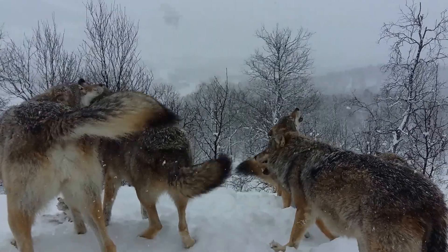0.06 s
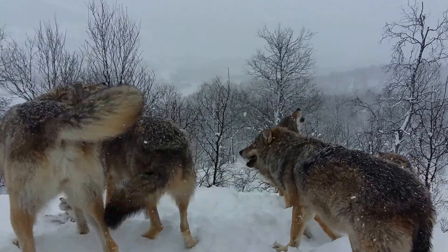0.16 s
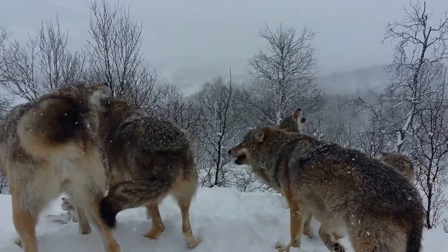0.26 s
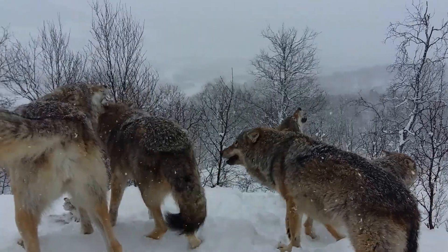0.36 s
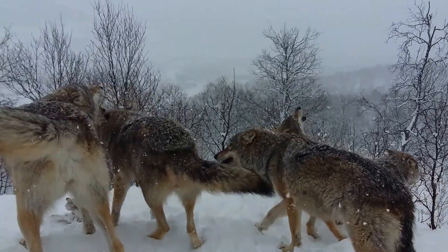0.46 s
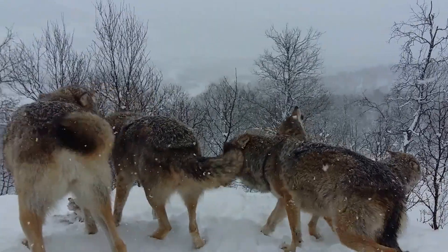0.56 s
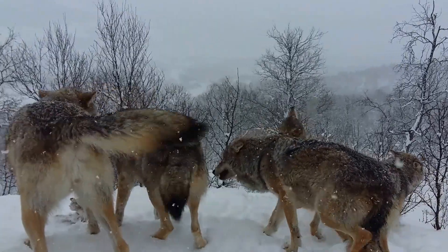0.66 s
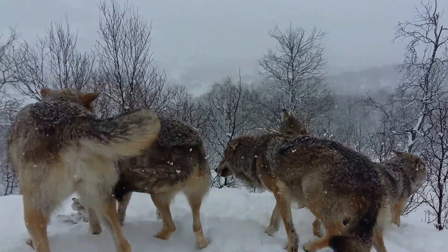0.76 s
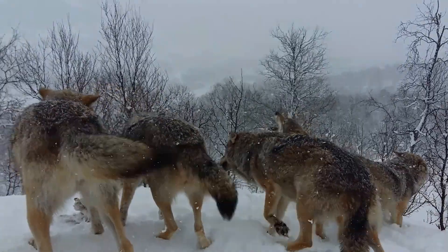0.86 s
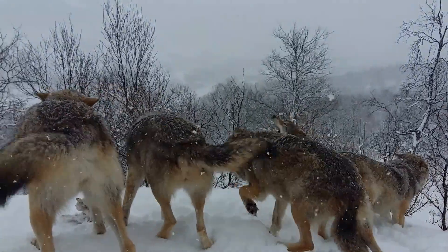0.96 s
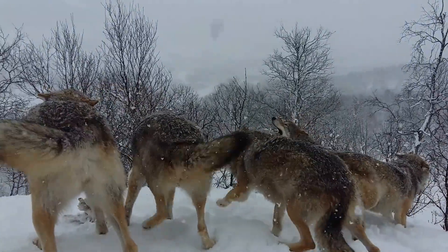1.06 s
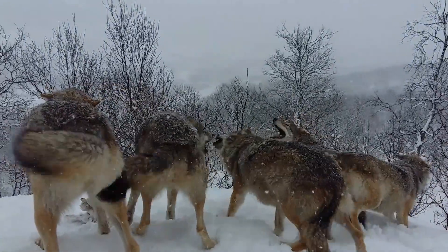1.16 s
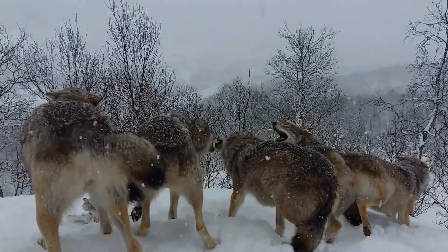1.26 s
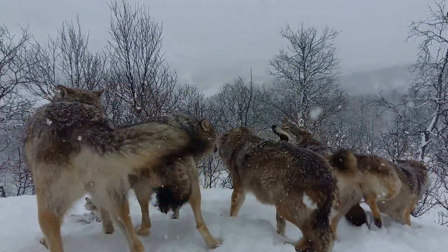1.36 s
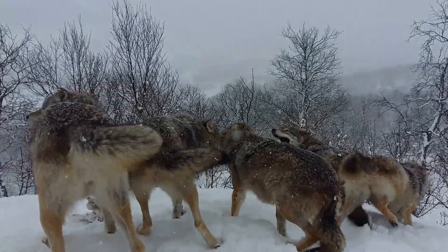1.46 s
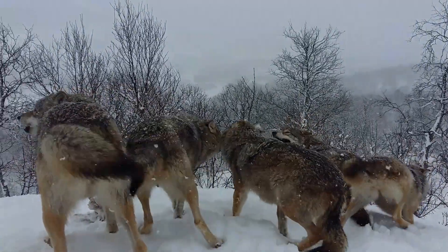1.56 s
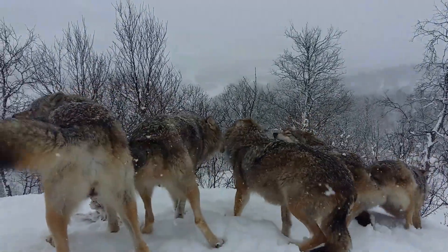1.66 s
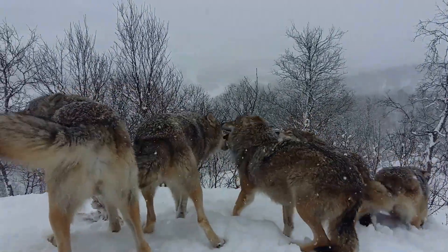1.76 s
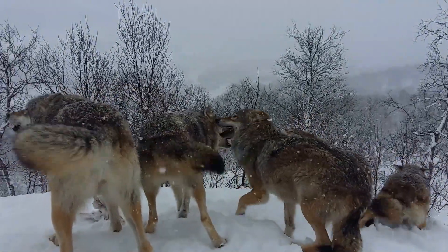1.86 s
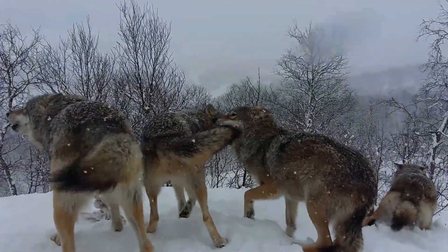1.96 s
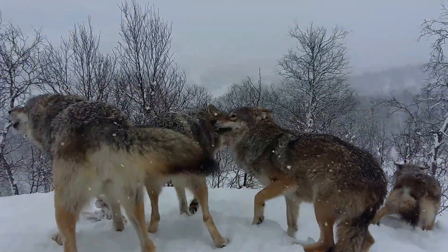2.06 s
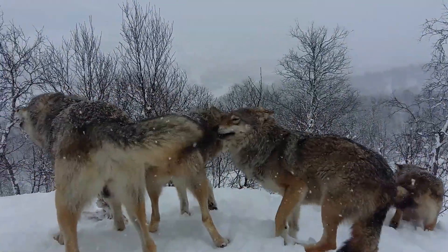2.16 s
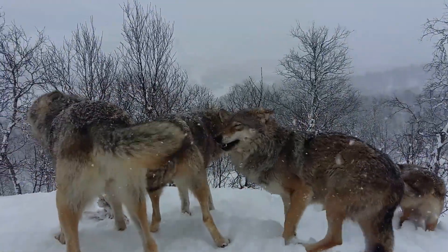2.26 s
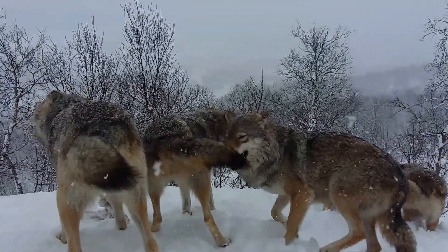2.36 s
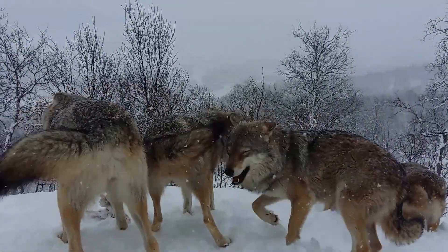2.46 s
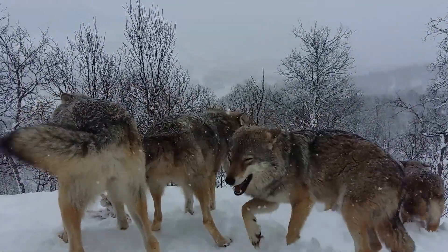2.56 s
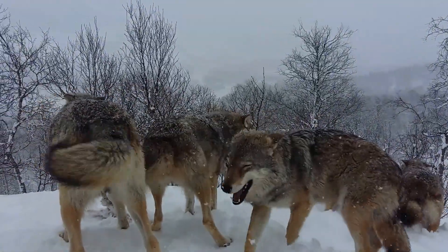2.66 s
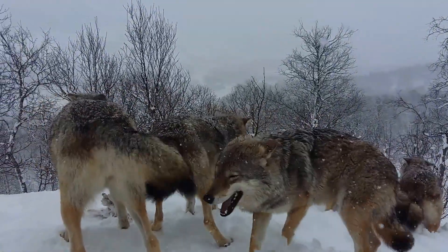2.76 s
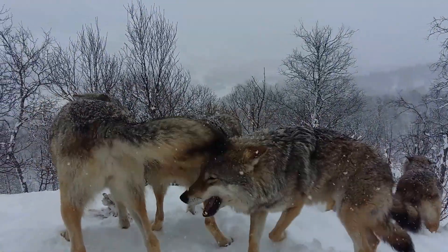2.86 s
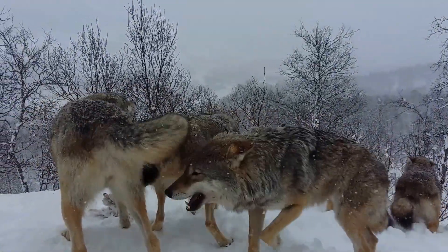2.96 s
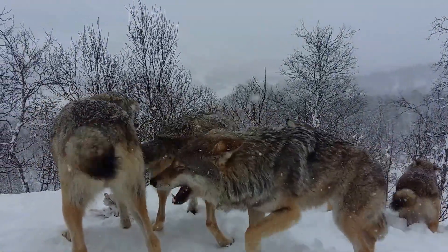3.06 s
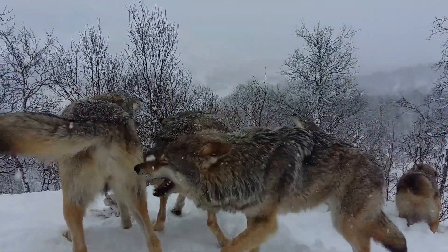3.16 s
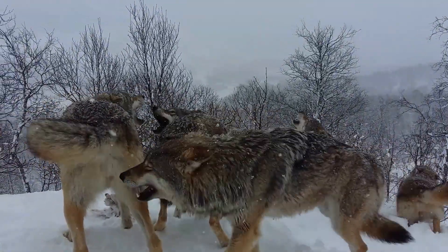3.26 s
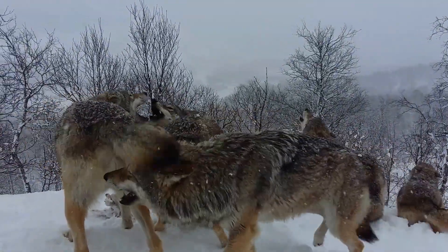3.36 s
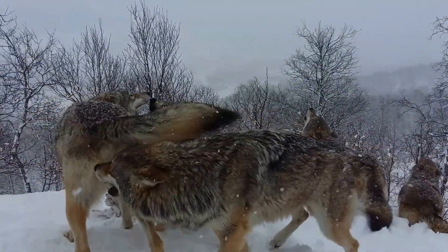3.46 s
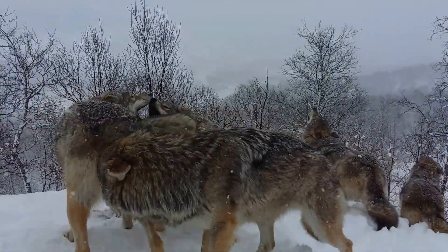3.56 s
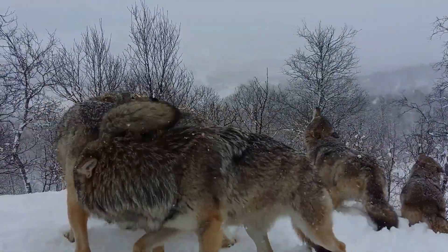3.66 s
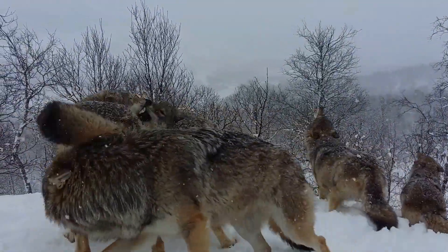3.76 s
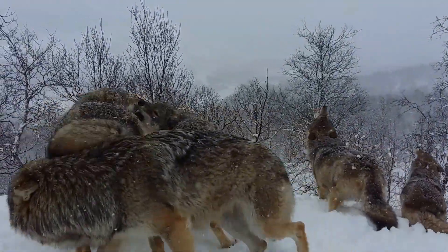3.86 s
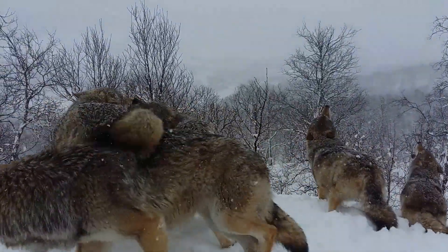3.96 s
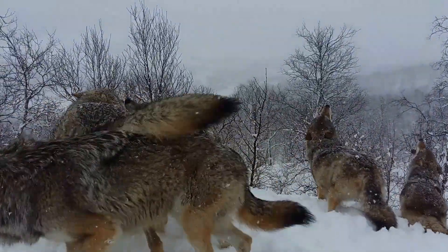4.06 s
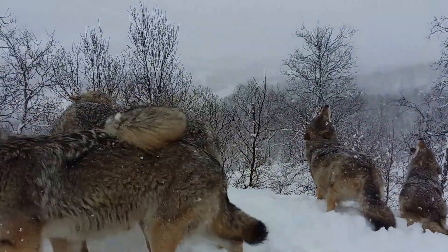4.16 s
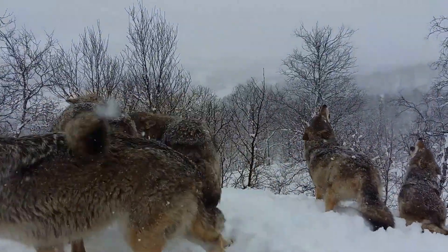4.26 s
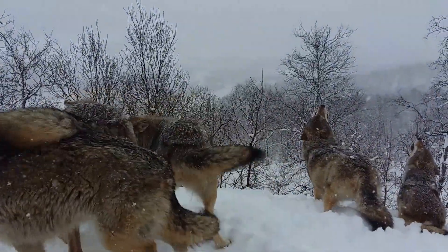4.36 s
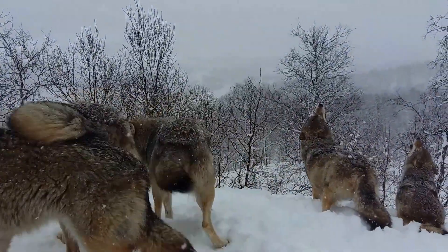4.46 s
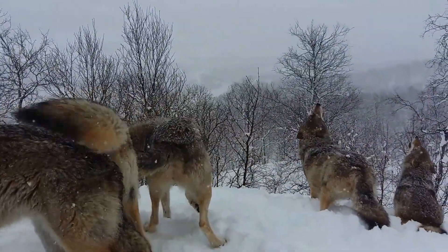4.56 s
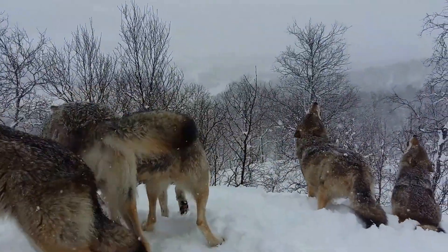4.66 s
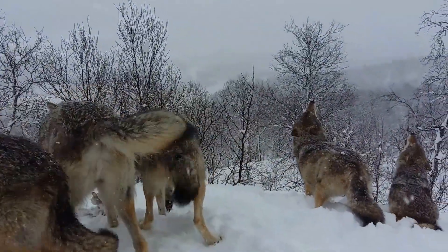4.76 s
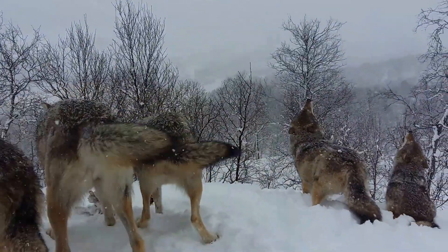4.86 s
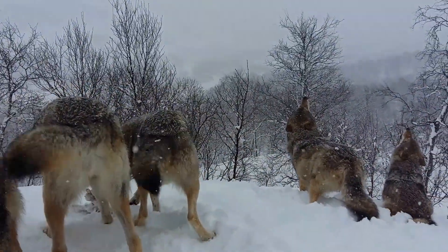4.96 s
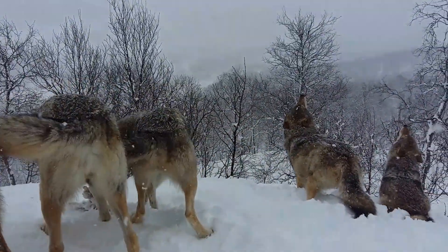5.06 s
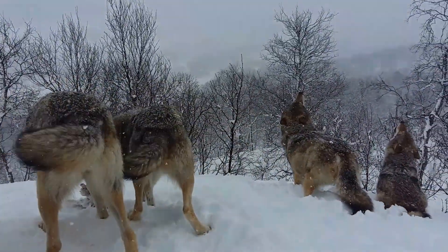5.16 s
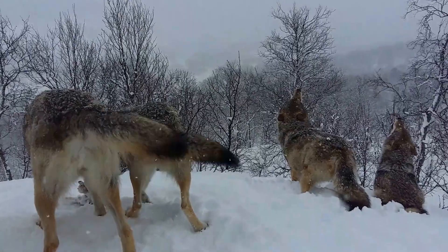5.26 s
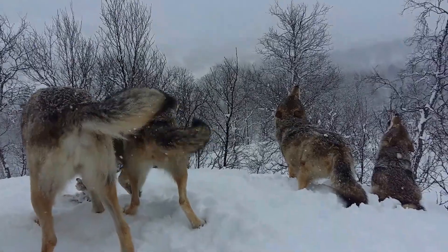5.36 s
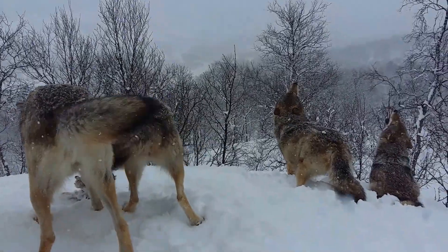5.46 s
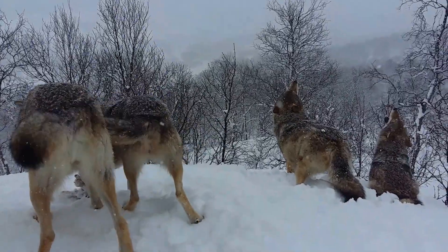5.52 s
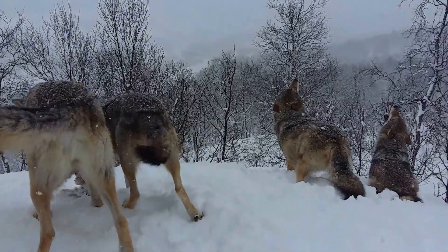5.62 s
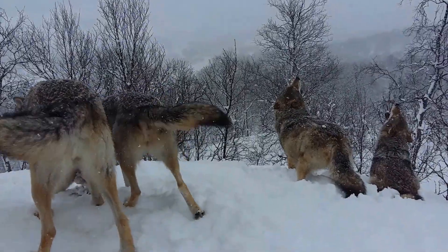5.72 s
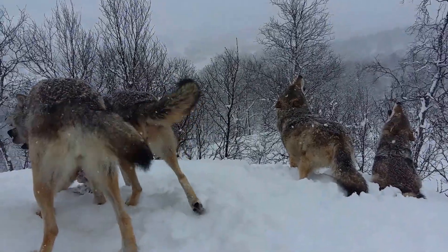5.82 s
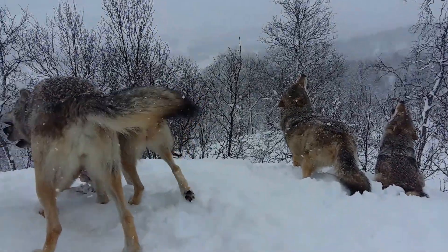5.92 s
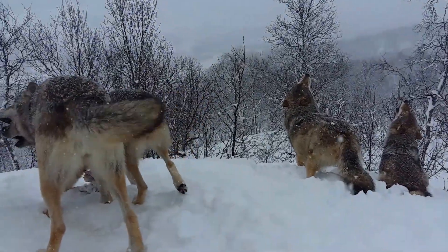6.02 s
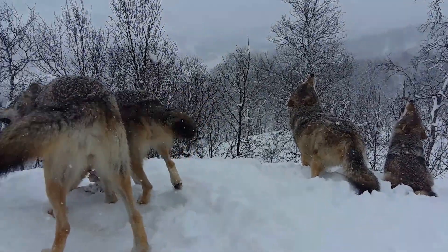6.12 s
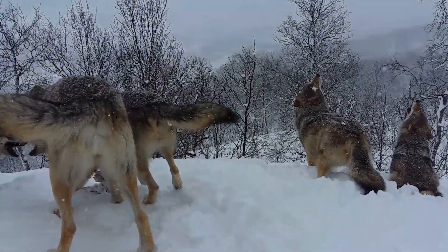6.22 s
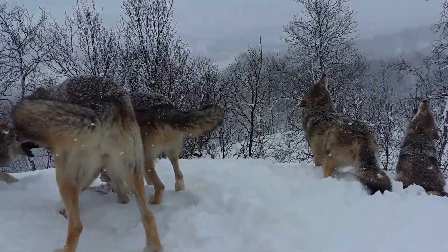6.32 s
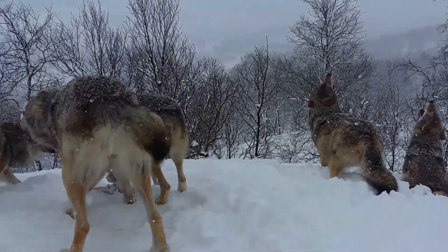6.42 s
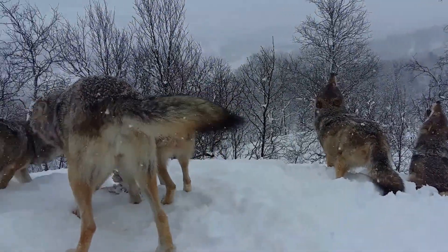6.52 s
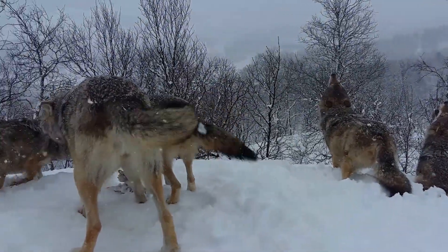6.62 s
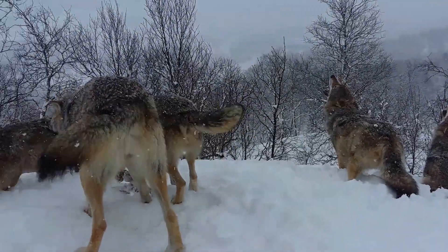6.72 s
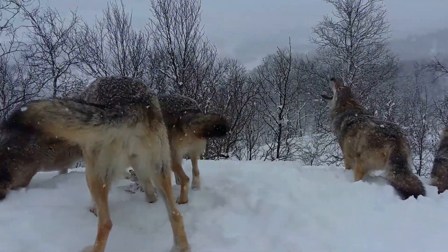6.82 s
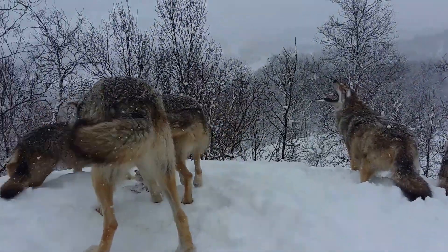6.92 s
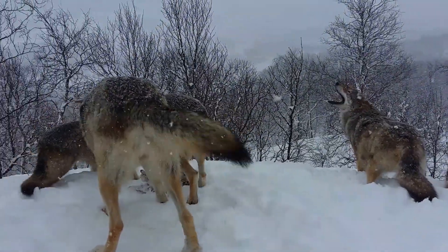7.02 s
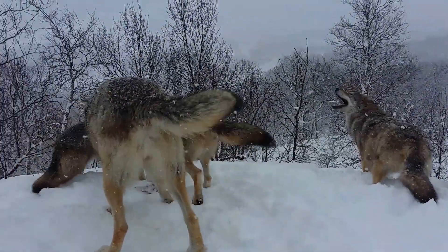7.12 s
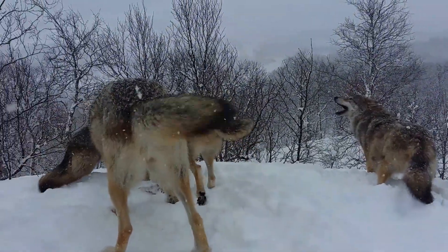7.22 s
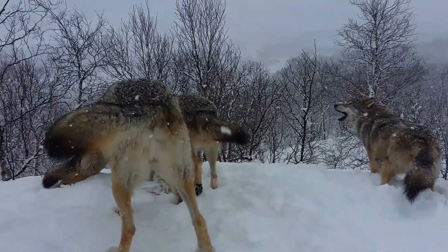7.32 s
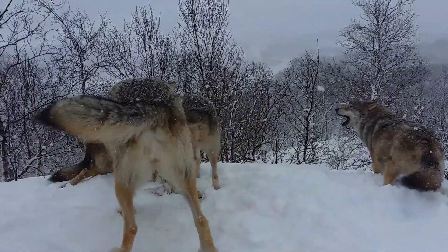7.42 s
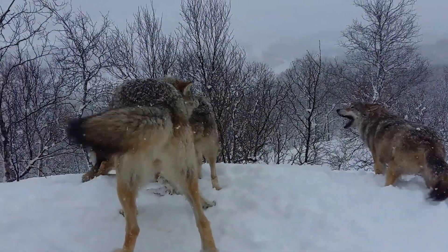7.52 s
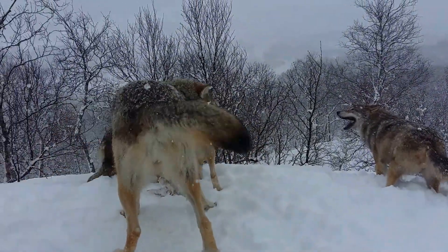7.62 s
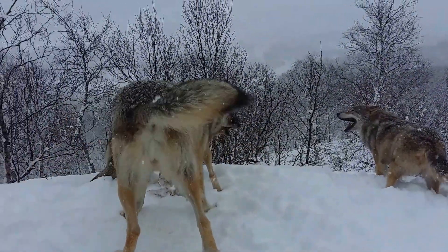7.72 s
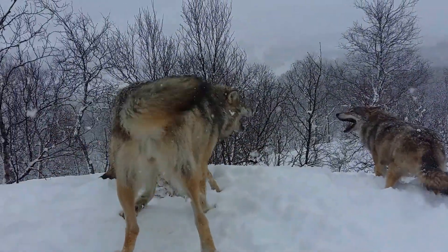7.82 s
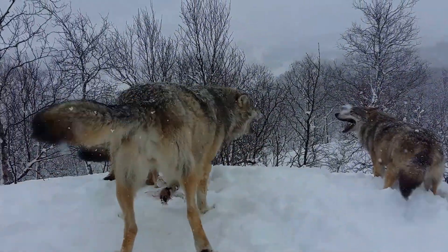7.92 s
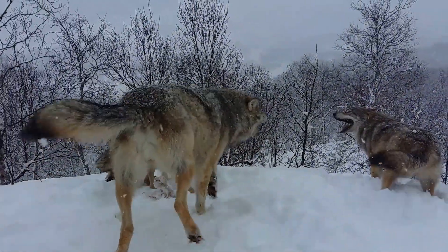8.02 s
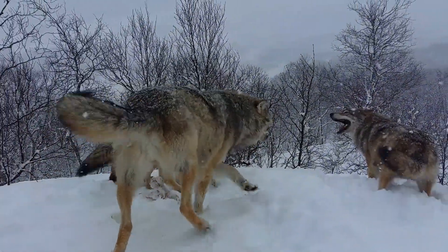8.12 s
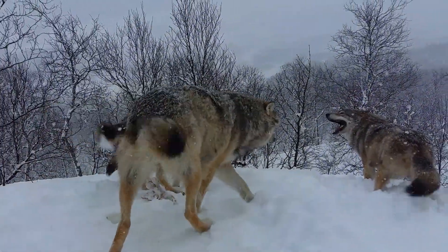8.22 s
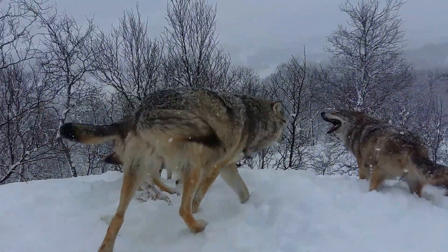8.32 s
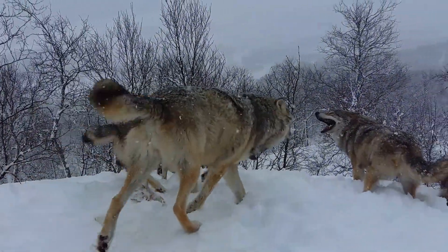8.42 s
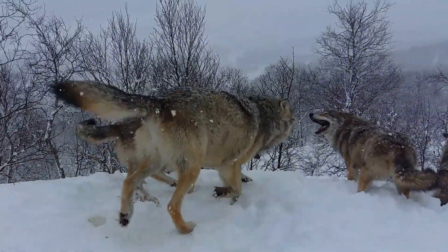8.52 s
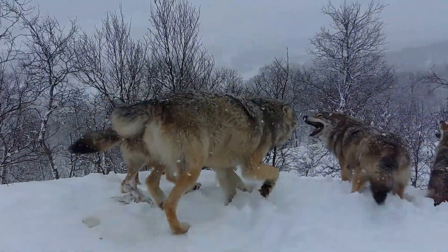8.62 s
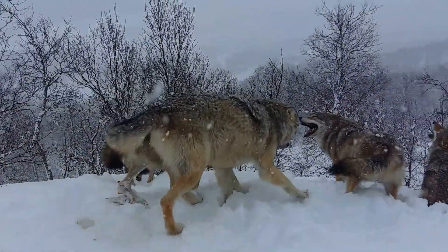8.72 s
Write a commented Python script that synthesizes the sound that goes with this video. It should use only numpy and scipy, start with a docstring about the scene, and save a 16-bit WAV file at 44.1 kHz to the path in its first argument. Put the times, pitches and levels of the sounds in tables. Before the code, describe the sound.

After a brief silence, a near wolf's long mid-low howl fades in quickly and the pack joins. Wavering yowls break into yelps, thin high squeals ride on top, and farther wolves fill the background from all sides. Soft thuds of paws in snow and a few very short snarls sit underneath. The microphone is close among the animals in an open snowy clearing, with a soft, scattered echo from bare trees.

```python
"""A wolf howls long and low over a snowy clearing, and its pack, near and far, joins in chorus.
Wavering yowls and high squeals ride over the howls; each voice is a stack of harmonics shaped by throat and mouth,
growing louder and more open as its pitch rises. Paws thud as swells of dark noise, a few snarls are chopped noise,
and the bare trees throw back a soft echo made of scattered taps."""
import sys
import numpy as np
from scipy import signal
from scipy.fft import rfft, irfft
from scipy.io import wavfile
from scipy.ndimage import uniform_filter1d, minimum_filter1d, map_coordinates

SR = 44100
rng = np.random.default_rng(int(sys.argv[2]) if len(sys.argv) > 2 else 0)


def pcm_store(signal):
    """Save signal as 16-bit PCM."""
    levels = np.round(np.clip(np.atleast_2d(signal), -1, 1) * 32767)
    wavfile.write(sys.argv[1], SR, levels.astype(np.int16).T)


N = 387330
TIME = np.arange(N) / SR

# Long, steady howls of the near wolves, one call a row. Columns: level_db [dB, before the gain of its kind],
# swell_db [dB, rise from start to end], mouth_hz [Hz, resonance at the call's average pitch],
# bright_db [dB per octave of harmonics, up to the sixth], lag_ms [ms, left ear later than right],
# pitch [list of (point_s [s], pitch_hz [Hz])]
HOWL_CALLS = [(-18.5, -2, 753, 6.5, -0.039, [(0.252, 510), (0.332, 486.5), (0.396, 423.6), (0.436, 457.2),
              (0.592, 414.5), (0.61, 438), (0.782, 452), (0.968, 437)]),
              (-20.0, 4, 830, -10.5, -0.18, [(1.316, 499), (1.432, 362), (1.646, 340), (1.8, 351.3),
              (2.038, 350), (2.42, 425.7), (2.562, 526), (2.58, 435)]),
              (-23.5, 12.5, 590, 8.5, -0.035, [(1.834, 451.6), (2.026, 371.4)]),
              (-23, 4.5, 780, 2.0, 0.0, [(3.042, 406), (3.184, 424.4), (3.44, 349)]),
              (-20.5, 5, 620, -1.5, 0.084, [(3.446, 395), (3.884, 422), (4.042, 485.4), (4.154, 473.8),
              (4.546, 451.5), (4.894, 472), (5.096, 521)]), (-24.5, 6.5, 940, -0.5, -0.096, [(4.304, 708),
              (4.524, 582), (4.644, 638), (5.03, 645.4)]), (-21, -5, 930, 2.5, 0.094, [(5.1, 482.3),
              (5.208, 493.5), (5.306, 441.6), (5.566, 403)]),
              (-20.5, -7.5, 766, -1.5, -0.032, [(5.566, 469), (5.608, 485.4), (5.774, 512), (5.792, 461),
              (6.032, 404.4)]), (-15, 5.5, 920, 0, -0.32, [(5.854, 559.4), (5.996, 531), (6.096, 609)]),
              (-19.5, 6.5, 700, 4.5, -0.35, [(6.012, 451), (6.218, 439.7), (6.356, 496.4)]),
              (-31.5, -4.5, 1140, 1, -0.15, [(6.58, 447), (6.982, 427), (7.288, 359), (7.85, 433.6)]),
              (-21.5, -10.5, 700, -1, 0.0, [(7.176, 504.7), (7.194, 617.4), (7.32, 563), (7.528, 607),
              (7.724, 572), (7.892, 660)]), (-20.5, 14.5, 730, -2, -0.018, [(8.512, 399), (8.682, 375.3),
              (8.774, 437), (8.82, 470)])]
# Wavering yowls that break upward into yelps. Columns: level_db [dB, before the gain of its kind], swell_db [dB],
# mouth_hz [Hz], bright_db [dB per octave], lag_ms [ms], pitch [list of (point_s [s], pitch_hz [Hz])]
YOWL_CALLS = [(-16.0, 4.5, 804, 3.5, -0.1, [(0.486, 420.4), (0.52, 763), (0.692, 771), (0.716, 1036),
              (0.788, 830), (0.894, 743), (0.96, 626), (1.008, 876), (1.054, 603), (1.108, 512)]),
              (-19, 7, 1030, -2.5, -0.05, [(0.75, 1015), (0.878, 986), (0.968, 844), (1.006, 560),
              (1.132, 516)]), (-15.5, -2.5, 965, -2.5, -0.014, [(1.118, 499), (1.14, 625), (1.264, 622),
              (1.422, 573), (1.456, 903), (1.526, 521), (1.588, 591), (1.658, 516)]),
              (-16.0, -1, 930, -1.5, 0.0, [(1.132, 479), (1.194, 833), (1.212, 605), (1.25, 855),
              (1.288, 611)]), (-20, 4.5, 820, 6, -0.029, [(1.454, 472), (1.558, 516), (1.606, 435),
              (1.774, 478), (1.792, 419), (1.906, 460), (1.996, 495), (2.048, 435)]),
              (-18.0, -2, 690, 8, -0.028, [(2.058, 472), (2.118, 475), (2.152, 595), (2.206, 608),
              (2.242, 1039), (2.29, 413)]), (-15, 4.5, 1190, 6.5, -0.055, [(2.27, 928), (2.286, 877),
              (2.306, 749), (2.4, 489), (2.452, 471), (2.498, 619), (2.55, 512), (2.61, 474), (2.73, 497)]),
              (-19.5, -1, 870, 8.0, 0.0, [(2.37, 693), (2.392, 790), (2.456, 680), (2.506, 812),
              (2.58, 548), (2.666, 767), (2.716, 658)]), (-16, -5.5, 880, 5, -0.043, [(2.738, 692),
              (2.788, 984), (2.814, 840), (2.958, 852), (3.02, 770), (3.046, 902), (3.102, 852),
              (3.208, 992), (3.34, 820), (3.47, 1002), (3.514, 614)]),
              (-18.5, -5, 1130, 4.5, -0.035, [(2.748, 461), (2.796, 566), (2.84, 496), (2.9, 625),
              (2.974, 580), (3.02, 505), (3.128, 417)]), (-18, 2, 850, 0.5, -0.063, [(3.476, 672),
              (3.552, 954), (3.57, 779), (3.628, 785), (3.658, 674)]),
              (-20, -2.5, 840, 6, -0.11, [(3.528, 404), (3.58, 550), (3.666, 394), (3.766, 512),
              (3.808, 420), (3.996, 384)]), (-29.5, -7, 820, 4, 0.04, [(3.71, 420), (3.742, 641),
              (3.826, 307), (3.942, 270), (4.018, 434)]), (-17.5, 5.5, 1770, -3.5, -0.14, [(4.63, 560),
              (4.732, 478), (4.792, 574), (4.834, 1170), (4.86, 932), (4.936, 592), (4.992, 675),
              (5.056, 566), (5.098, 645)]), (-24.5, -23, 1180, -4.5, -0.25, [(5.098, 608), (5.15, 653),
              (5.256, 591), (5.299, 640), (5.386, 630), (5.448, 576), (5.468, 461)]),
              (-19, 10.5, 930, 0.5, -0.18, [(5.164, 888), (5.234, 706), (5.326, 764), (5.402, 887),
              (5.47, 929), (5.492, 779), (5.546, 594), (5.6, 629), (5.63, 426)]),
              (-19, 14, 1250, -2.5, -0.2, [(5.52, 765), (5.57, 881), (5.744, 806), (5.862, 856),
              (5.882, 1038), (5.938, 943), (5.964, 853)]), (-18.5, -2, 320, -4.5, 0.077, [(6.02, 844),
              (6.116, 994), (6.192, 823), (6.226, 934), (6.392, 941), (6.42, 876), (6.568, 1025),
              (6.63, 1026), (6.678, 932)]), (-19.5, 2.5, 1080, 4.5, -0.3, [(6.116, 520), (6.196, 652),
              (6.23, 581), (6.302, 644), (6.352, 528), (6.442, 466), (6.522, 550), (6.686, 502)]),
              (-22.5, 4, 770, 1.0, -0.21, [(6.49, 814), (6.514, 863), (6.568, 642), (6.646, 627),
              (6.754, 647), (6.916, 595), (7.034, 609), (7.062, 552), (7.16, 499)]),
              (-25, 8.5, 1100, -3, -0.2, [(6.532, 944), (6.592, 916), (6.692, 873), (6.78, 945),
              (6.928, 845)]), (-17.0, 2.5, 910, -6.5, 0.11, [(6.744, 724), (6.836, 731), (6.896, 670),
              (6.978, 815), (7.12, 767), (7.166, 654), (7.206, 789), (7.248, 731)]),
              (-24, 3.5, 1040, -4.5, 0.14, [(7.276, 750), (7.328, 883), (7.37, 672), (7.414, 973),
              (7.488, 542)]), (-15.5, 4.5, 1176, -4, 0.091, [(7.596, 701), (7.682, 814), (7.702, 1051),
              (7.728, 850), (7.866, 846), (7.906, 615)]), (-24, 1.5, 780, 4.5, 0.0, [(7.632, 495.6),
              (7.696, 497.7), (7.724, 607), (7.836, 631), (7.858, 551), (7.876, 449)]),
              (-24, -9, 1320, 0, 0.023, [(7.882, 489), (7.924, 621), (7.962, 428), (7.986, 552),
              (8.112, 495), (8.142, 672), (8.18, 502.4), (8.226, 560), (8.546, 491)]),
              (-23.5, -2, 740, 5, 0.11, [(7.896, 305), (8.028, 404), (8.09, 319), (8.228, 397),
              (8.264, 352), (8.286, 405), (8.474, 331), (8.51, 381)]),
              (-14.0, -0.5, 1220, 0.5, 0.06, [(7.912, 616), (8.04, 542), (8.208, 647), (8.336, 600),
              (8.382, 828), (8.422, 604), (8.46, 810), (8.494, 587), (8.538, 640), (8.702, 526),
              (8.74, 559), (8.812, 509.4)])]
# High, nearly pure squeals. Columns: level_db [dB, before the gain of its kind], swell_db [dB],
# mouth_hz [Hz], bright_db [dB per octave], lag_ms [ms], pitch [list of (point_s [s], pitch_hz [Hz])]
SQUEAL_CALLS = [(-17.5, 1.5, 900, 0.5, -0.1, [(0.656, 796), (0.784, 1143), (0.85, 837), (0.914, 759)]),
                (-12, 2, 1320, -7, -0.021, [(2.038, 1260), (2.096, 1282), (2.194, 1044), (2.304, 853)]),
                (-21, 0, 1000, -13, -0.11, [(3.04, 1048), (3.06, 1176), (3.098, 1133), (3.13, 1401),
                (3.17, 810)]), (-17.5, 5, 760, 1.5, -0.11, [(3.188, 1129), (3.21, 1411), (3.284, 1472),
                (3.314, 1242), (3.37, 1453), (3.42, 1178), (3.446, 1306), (3.484, 1165)]),
                (-16.0, -2, 470, -2.5, -0.1, [(3.712, 1298), (3.75, 1530), (3.79, 1386), (3.816, 1467),
                (3.932, 1542), (3.982, 1363), (4.068, 1278), (4.116, 1386), (4.208, 1257), (4.254, 1392),
                (4.296, 1237)]), (-18.0, 8.5, 1130, -2, 0.11, [(4.126, 1057), (4.234, 1060), (4.354, 1026),
                (4.426, 806)]), (-17.5, -2.5, 440, -1.5, -0.057, [(4.46, 784), (4.508, 882), (4.556, 780),
                (4.604, 1252), (4.66, 634)]), (-13, -4.5, 840, -6, -0.24, [(5.3, 970), (5.317, 1250),
                (5.398, 1309), (5.45, 1180), (5.48, 908)])]
# What every wolf's throat and muzzle let through. Columns: frequency_hz [Hz], relative_level_db [dB]
THROAT_RESPONSE = [(250, -8.5), (400, 0), (1400, 5.5), (1900, 5.5), (2300, 3), (2900, -18), (3500, -10.5),
                   (4600, -6.5), (6500, -12), (8000, -24), (11000, -31.5)]
# Overtones swell as muzzles turn to the microphone.
# Columns: time_s [s], treble_db [dB, before each voice adds its facing_db]
FACING_CURVE = [(.4, -53.5), (.8, -52.5), (1.8, -52.5), (2.3, -66), (3.2, -57.5), (4.1, -48), (5.3, -54.5),
                (5.9, -53), (6.25, -51), (6.7, -57), (7.5, -60), (7.9, -50)]
# The far wolves together. Columns: time_s [s], level_db [dB]
FAR_PACK_LEVEL = [(.25, -18.5), (.5, -30), (1.4, -18.5), (2.1, -27), (2.8, -25), (4.1, -31), (4.8, -21.5),
                  (6.2, -22.5), (7.0, -21.5), (7.5, -24.5), (8.1, -26), (8.7, -30)]
# Paws landing in snow. Columns: start_s [s], length_s [s], level_db [dB]
PAW_STEPS = [(.62, .1, -45), (1.3, 0.16, -32.5), (1.85, 0.84, -43.5), (4.36, 0.13, -35.5), (5.6, 0.09, -39),
             (5.75, 0.055, -33), (8.02, 0.089, -45.5)]
# The pack shuffling about. Columns: time_s [s], level_db [dB, before its random unevenness]
SHUFFLE_LEVEL = [(6.3, -55), (6.8, -67), (7.5, -66), (8.1, -55)]
# Colour of steps in snow. Columns: frequency_hz [Hz], relative_level_db [dB]
SNOW_COLOUR = [(25, -27.5), (70, -10.5), (130, -4.5), (240, -4), (400, 0.5), (1500, -32), (12000, -62)]
# Colour of the winter air. Columns: frequency_hz [Hz], relative_level_db [dB]
AIR_COLOUR = [(30, -8.5), (80, -1), (900, -7.5), (5500, -8.5), (8000, -23), (11000, -27.5), (15000, -39.5)]
# Snarls. Columns: start_s [s], length_s [s], level_db [dB, before the rattle]
SNARL_BURSTS = [(1.42, 0.084, -32.5), (3.47, 0.085, -28.5), (6.1, 0.14, -27)]

# every voice fades in, holds and fades out
ATTACK_S, RELEASE_S = 0.028, 0.029
# near calls reach this far beyond their first and last pitch points
OVERHANG_S = 0.015
# a near wolf pushes harder and opens its mouth as the pitch goes up
PUSH_DB_PER_OCTAVE, MOUTH_OCTAVES_PER_OCTAVE = 3.5, 0.17
# average rate of the pitch waver
WAVER_HZ = 9
# silence before the fade-in, its length, and the upper band limit
START_S, FADE_IN_S, EDGE_HZ = 0.225, 0.22, 15700


def gain_of(db):
    """Decibels to amplitude."""
    return 10 ** (np.asarray(db) / 20)


def evened(x):
    """Scales to an rms of one."""
    return x / np.sqrt(np.mean(x ** 2) + 1e-20)


def read(points, hz):
    """Reads a spectrum at any frequency, straight on a log axis."""
    f, value = np.transpose(points)
    return np.interp(np.log(hz + 1), np.log(f + 1), value)


def follow(curve, t):
    """Reads a curve at any time, straight between its points."""
    return np.interp(t, *np.transpose(curve)[:2])


def add(mix, start_s, sound):
    """Lays a stereo sound into the mix, cut where the mix ends."""
    part = mix[:, max(round(start_s * SR), 0):][:, :sound.shape[1]]
    part += sound[:, :part.shape[1]]


def wander(t, top_hz):
    """Random drift of rms about one: twelve sines of random phase, the slower ones stronger."""
    rates = np.geomspace(top_hz / 10, top_hz, num=12)
    coarse = np.arange(t[0], t[-1] + 0.004, 0.002)
    cycles = rates[:, None] * coarse + rng.random((len(rates), 1))
    waves = np.sin(2 * np.pi * cycles) / np.sqrt(rates[:, None])
    drift = waves.sum(0) / np.sqrt(np.sum(0.5 / rates))
    return np.interp(t, coarse, drift)


def placed(x, lag_ms):
    """Places a sound sideways: a positive lag makes it reach the left ear later than the right."""
    at = np.arange(len(x))
    shift = lag_ms * SR / 2000  # half the lag on each side, in samples
    left = map_coordinates(x, [at - shift], order=3)
    right = map_coordinates(x, [at + shift], order=3)
    return np.array([left, right])


def voice(t, hz, level_db, mouth_hz, bright_db, top_hz, vibrato, jitter, shimmer_db, sharpness=3,
          facing_db=52.5, squeal_db=10, break_db=5, break_octaves_per_s=10):
    """Vocal folds give a stack of harmonics; the open mouth lifts those near its resonance."""
    # vibrato and jitter are fractions of the pitch
    waver = np.sin(2 * np.pi * np.cumsum(WAVER_HZ + 2 * wander(t, 6)) / SR)
    sung_hz = hz * (1 + vibrato * waver + jitter * wander(t, 220))
    phase = 2 * np.pi * np.cumsum(sung_hz) / SR

    # harmonic levels are worked out on a coarse grid of every 64th sample
    step = 64
    coarse_t, coarse_hz = t[::step], sung_hz[::step]
    order = np.arange(1, int(top_hz / np.median(sung_hz)) + 1)[:, None]
    partial_hz = order * coarse_hz
    ratio = partial_hz / mouth_hz[::step]
    resonance = 1 / np.hypot(1 - ratio ** 2, ratio / sharpness)
    tilt_db = bright_db * np.log2(np.minimum(order, 6))
    size = gain_of(read(THROAT_RESPONSE, partial_hz) + tilt_db) * resonance
    # a squeal is pressed so hard that its octave stands out
    size[1] *= gain_of(squeal_db * np.clip((coarse_hz - 1100) / 250, 0, 1))
    size *= gain_of(level_db[::step]) / np.sqrt(np.sum(size ** 2, 0) / 2)

    # only the short waves are beamed by the muzzle, and they thin out while the voice breaks in a fast glide
    glide = abs(np.gradient(np.log2(hz[::step]), step / SR))  # octaves per second
    breaking = np.tanh(glide / break_octaves_per_s)
    treble_db = follow(FACING_CURVE, coarse_t) + facing_db - break_db * breaking
    size *= gain_of(treble_db * np.clip((partial_hz - 2300) / 1000, 0, 1))

    out = np.zeros(len(t))
    for k, row in enumerate(size, 1):
        # each harmonic flutters by itself as the head moves over the reflecting snow, the high ones most
        flutter = gain_of(shimmer_db * np.sqrt(k) * wander(coarse_t, 22))
        tone = np.sin((k * phase % (2 * np.pi)).astype(np.float32))
        out += np.interp(t, coarse_t, row * flutter) * tone
    fade = np.clip(np.minimum((t - t[0]) / ATTACK_S, (t[-1] - t) / RELEASE_S), 0, 1)
    return out * np.sin(np.pi / 2 * fade)


def call(level_db, swell_db, mouth_hz, pitch):
    """Gives a call's time, pitch, level and mouth: level swells evenly, and both level and mouth rise with pitch."""
    point_s, point_hz = np.transpose(pitch)
    t = np.arange(point_s[0] - OVERHANG_S, point_s[-1] + OVERHANG_S, 1 / SR)
    hz = uniform_filter1d(follow(pitch, t), size=800)  # rounds the corners of the glide
    octaves = np.log2(hz / point_hz.mean())
    swell = swell_db * np.linspace(-0.5, 0.5, len(t))
    effort_db = level_db + swell + PUSH_DB_PER_OCTAVE * octaves
    return t, hz, effort_db, mouth_hz * 2 ** (MOUTH_OCTAVES_PER_OCTAVE * octaves)


def near_wolves(calls, gain_db, vibrato, jitter, shimmer_db):
    """Voices calls of one kind from the clearing, each with its own delay between the ears."""
    mix = np.zeros((2, N))
    for level_db, swell_db, mouth_hz, bright_db, lag_ms, pitch in calls:
        t, hz, effort_db, mouth = call(level_db, swell_db, mouth_hz, pitch)
        sound = voice(t, hz, effort_db, mouth, bright_db, 9500, vibrato, jitter, shimmer_db)
        add(mix, t[0], placed(sound, lag_ms))
    return gain_of(gain_db) * mix


def far_wolves(count=26, low_hz=420, high_hz=620, mouth_hz=1100, bright_db=0.5):
    """Overlapping yowls drift and sag in pitch around a random base, from all sides."""
    mix = np.zeros((2, N))
    starts_s = np.linspace(0, 8.2, count)
    for start_s, (when, height, length, side) in zip(starts_s, rng.random((count, 4))):
        t = start_s + 0.2 * when + np.arange(0, 0.63 + 0.5 * length, 1 / SR)
        u = np.linspace(0, 1, len(t))  # progress through the call
        base_hz = low_hz * (high_hz / low_hz) ** height
        hz = base_hz * np.exp(0.14 * (wander(t, 10) + 0.5 - u))
        level_db = -10 * (2 * u - 1) ** 2
        mouth = mouth_hz * np.exp(0.35 * wander(t, 4))
        sound = voice(t, hz, level_db, mouth, bright_db, top_hz=7000, vibrato=0.05, jitter=0.004,
                      shimmer_db=1.3, facing_db=49)
        add(mix, t[0], placed(sound, 1.07 * (side - 0.5)))
    return evened(mix) * gain_of(follow(FAR_PACK_LEVEL, TIME))


def trees(x, t60=0.88, treble_t60=0.38):
    """Trunks and branches scatter sparse random echoes, the treble dying first; t60 is seconds to fall 60 dB."""
    present = (rng.random((2, SR)) < 900 / SR) * (TIME[:SR] > 0.008)  # about 900 taps a second
    taps = rng.standard_normal((2, SR)) * present
    hz, t, z = signal.stft(taps, SR, nperseg=256)
    fall_s = read([(800, t60), (6000, treble_t60)], hz)[:, None]
    tail = signal.istft(z * gain_of(-60 * t / fall_s), SR, nperseg=256)[1]
    return signal.fftconvolve(x, tail / np.linalg.norm(tail[0]), axes=1)[:, :N]


def noise(spectrum, apart):
    """Stereo noise of a given colour; apart scales the part that is opposite in the two ears."""
    colour = gain_of(read(spectrum, np.fft.rfftfreq(N, 1 / SR)))
    mid, side = irfft(rfft(rng.standard_normal((2, N))) * colour, N)
    return evened(np.array([mid + apart * side, mid - apart * side]))


def bursts(table):
    """Level curve with one rounded swell a row."""
    level = np.zeros(N)
    for start_s, length_s, level_db in table:
        level += gain_of(level_db) * np.sin(np.pi * np.clip((TIME - start_s) / length_s, 0, 1))
    return level


def paws(uneven_db=6.5):
    """Heavy steps press the snow in swells of dark noise, over the uneven shuffling of the pack."""
    shuffle = gain_of(follow(SHUFFLE_LEVEL, TIME) + uneven_db * wander(TIME, 22))
    return noise(SNOW_COLOUR, apart=0.085) * (bursts(PAW_STEPS) + shuffle)


def snarls(rattle_hz=75, depth=1.0, mouth_hz=1400):
    """Turbulence in the throat, chopped by slack folds at an unsteady rate."""
    rate_hz = rattle_hz * (1 + 0.23 * wander(TIME, 40))
    rattle = 1 + depth * np.sin(2 * np.pi * np.cumsum(rate_hz) / SR)
    colour = [(100, -38)]
    for hz, db in THROAT_RESPONSE:
        colour.append((hz, db - 10 * np.log10(1 + (hz / mouth_hz) ** 3)))
    return noise(colour, apart=0.12) * rattle * bursts(SNARL_BURSTS)


def scene(air_db=-63):
    """Near and far wolves, their echo, paws and the winter air."""
    howls = near_wolves(HOWL_CALLS, gain_db=1.0, vibrato=0.0035, jitter=0.011, shimmer_db=2.03)
    yowls = near_wolves(YOWL_CALLS, gain_db=1, vibrato=0.013, jitter=0.0072, shimmer_db=1.94)
    squeals = near_wolves(SQUEAL_CALLS, gain_db=1.2, vibrato=0.0074, jitter=0.0097, shimmer_db=1.5)
    near = howls + yowls + squeals
    far = far_wolves() + snarls()  # snarls share the far wolves' stronger echo
    echo = trees(gain_of(-20) * near + gain_of(-12) * far)
    air = gain_of(air_db) * noise(AIR_COLOUR, apart=0.24)
    return near + far + echo + paws() + air


def record(dry):
    """The left capsule is the brighter one; then a quick fade-in, a smooth peak limiter and the band limit."""
    lean_db = read([(1000, 0.0), (2000, 4.5), (4500, 6), (8000, 0.4)], np.fft.rfftfreq(N, 1 / SR))
    capsules = gain_of(np.array([lean_db, -lean_db]) / 2)
    fade_in = np.clip((TIME - START_S) / FADE_IN_S, 0, 1)
    heard = irfft(rfft(dry) * capsules, N) * fade_in
    # both sides duck together around peaks above 0.93
    duck = minimum_filter1d(1 / np.maximum(abs(heard).max(0) / 0.93, 1), size=600)
    heard = heard * uniform_filter1d(uniform_filter1d(duck, size=300), size=300)
    low_pass = signal.firwin(511, EDGE_HZ, window=("kaiser", 9), fs=SR)
    return signal.oaconvolve(heard, low_pass[None], "same")


dry = scene()
out = record(dry)
pcm_store(out)
```